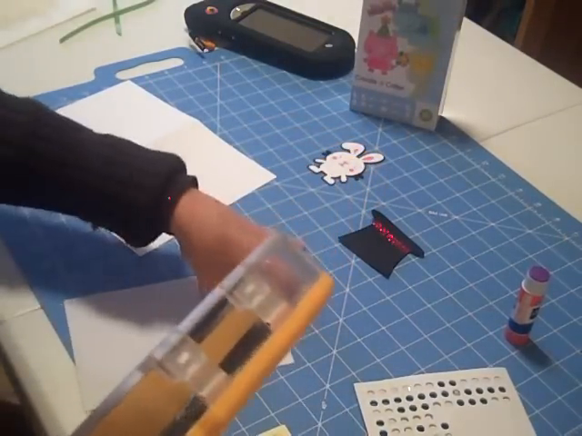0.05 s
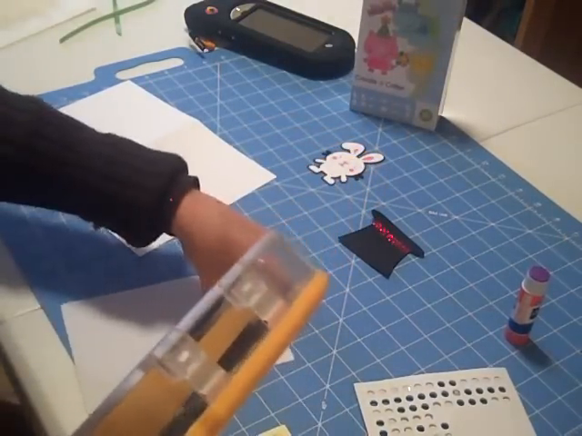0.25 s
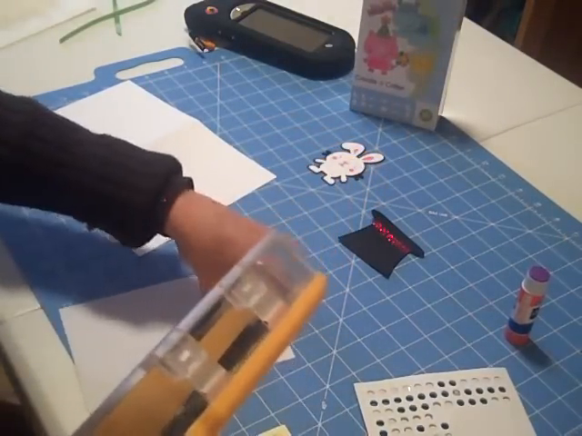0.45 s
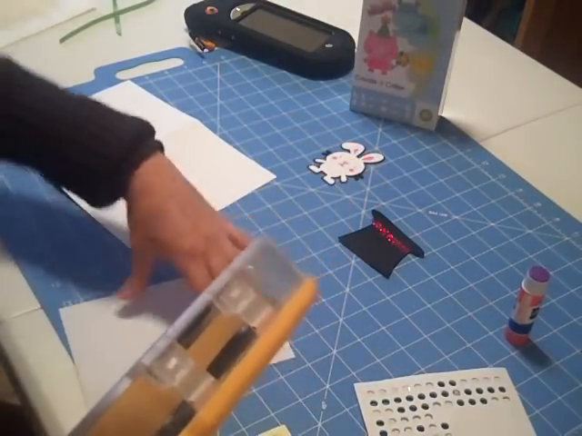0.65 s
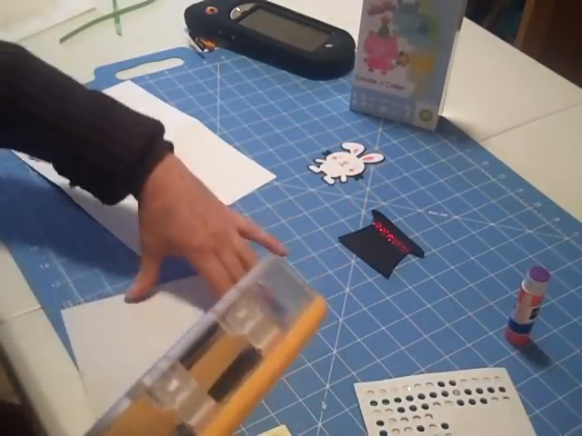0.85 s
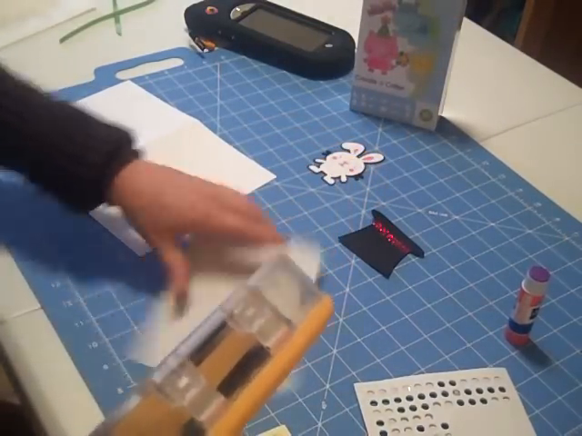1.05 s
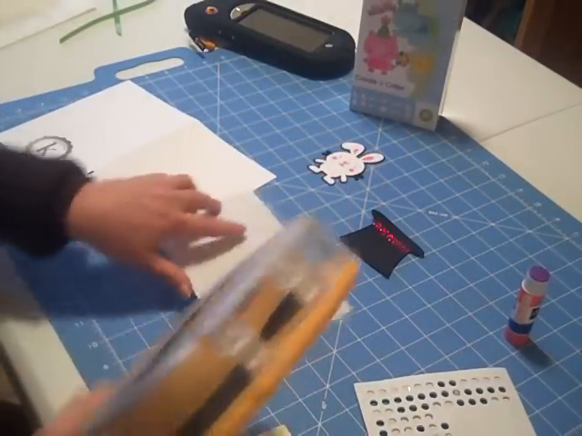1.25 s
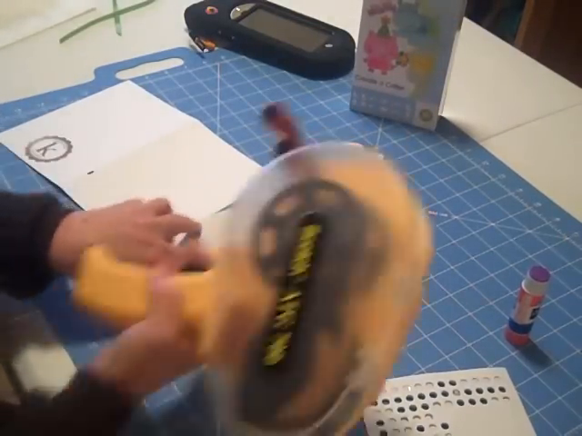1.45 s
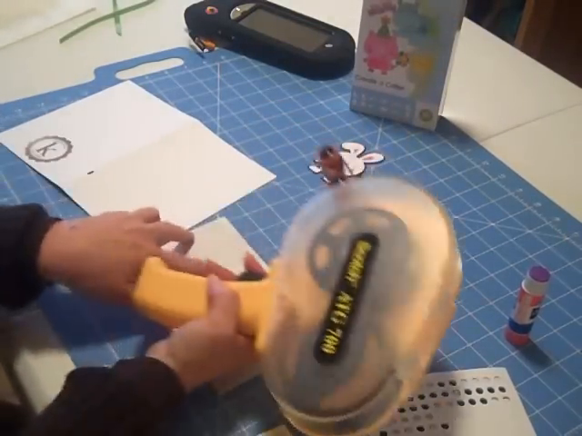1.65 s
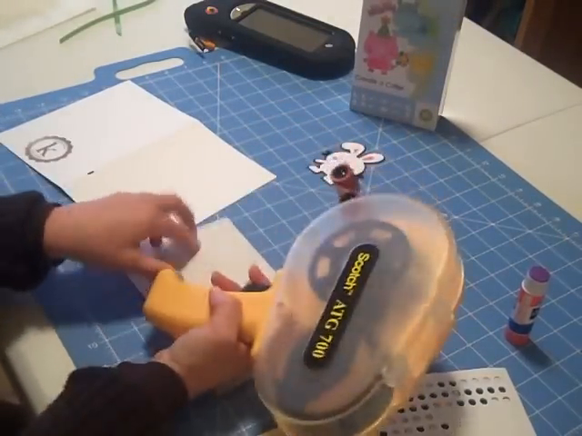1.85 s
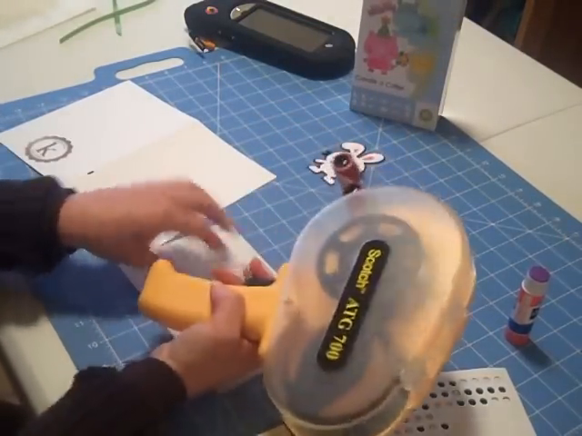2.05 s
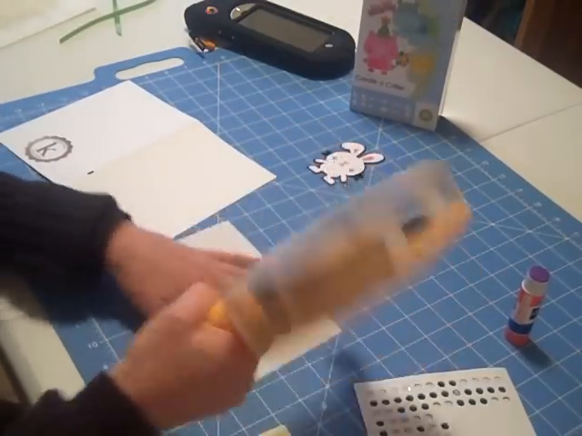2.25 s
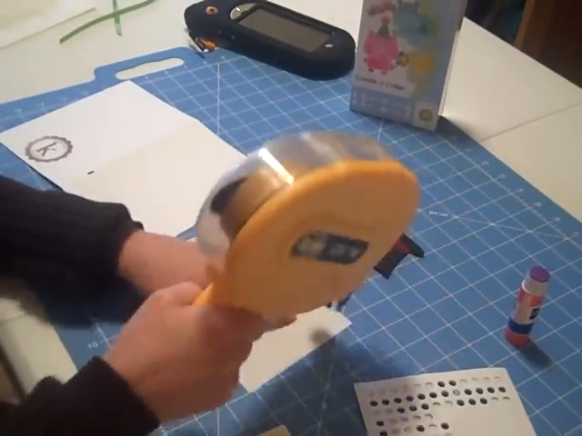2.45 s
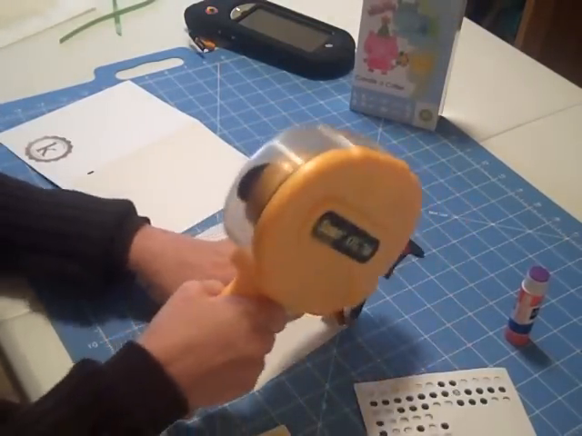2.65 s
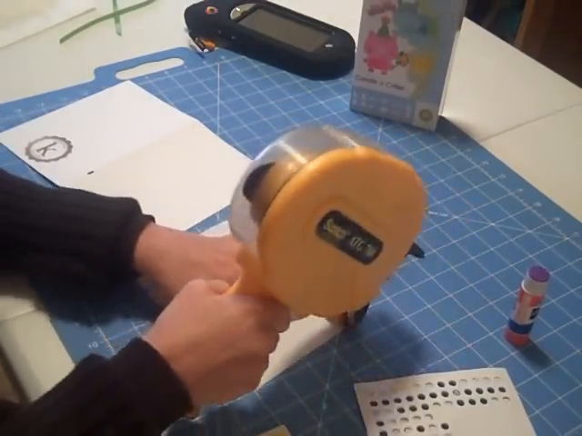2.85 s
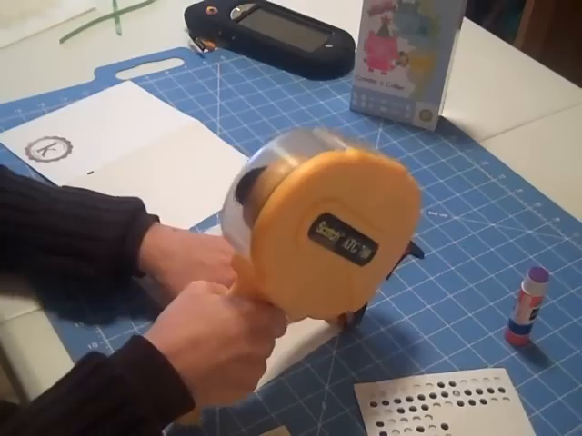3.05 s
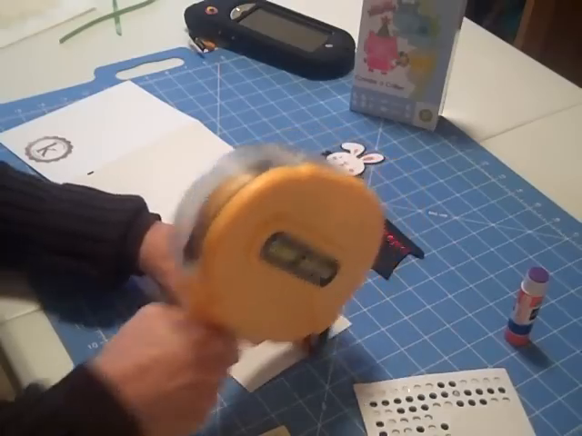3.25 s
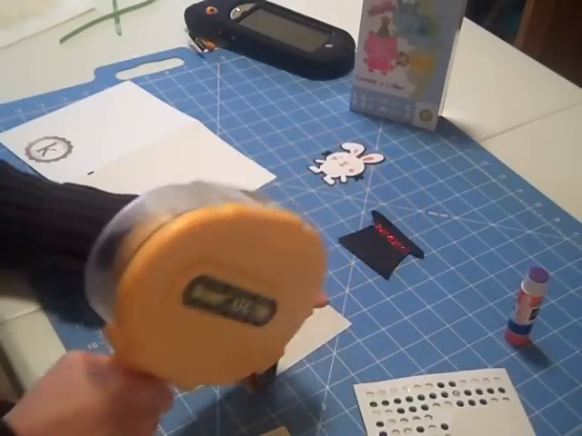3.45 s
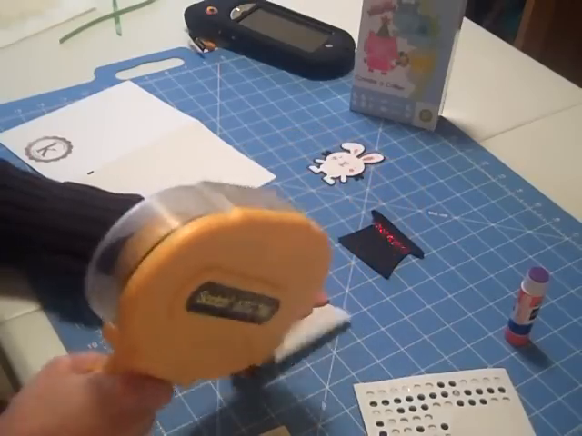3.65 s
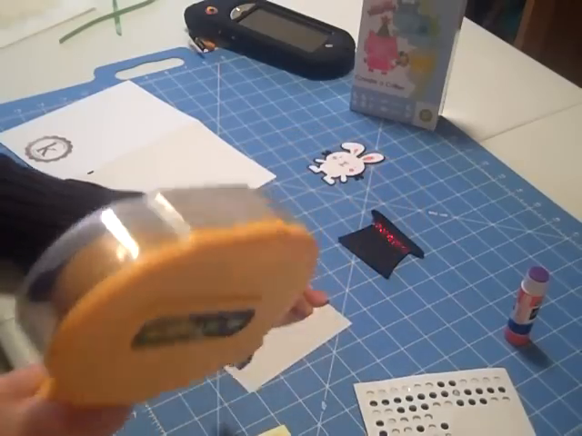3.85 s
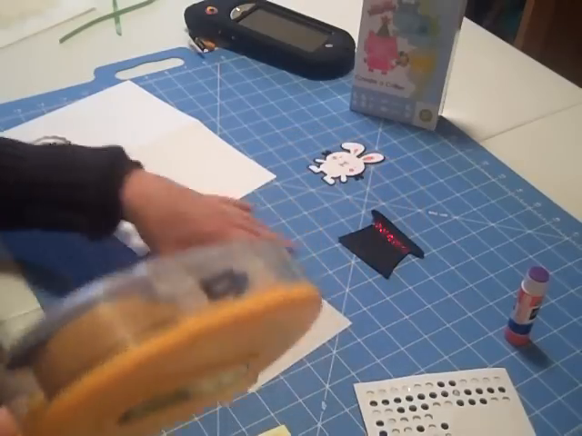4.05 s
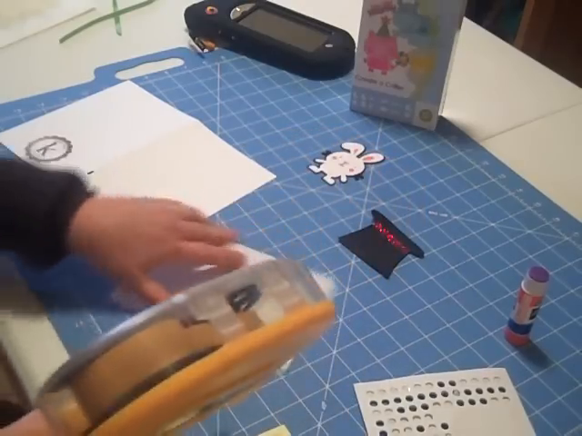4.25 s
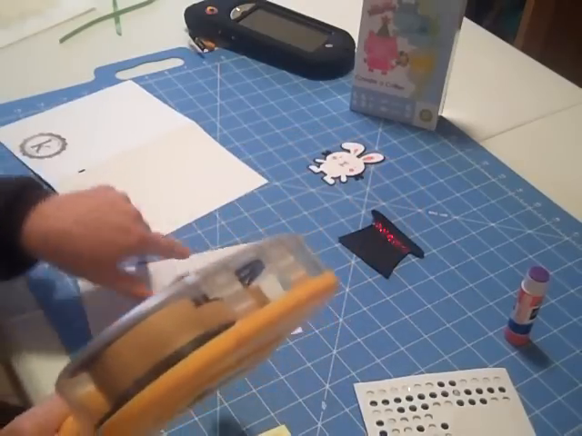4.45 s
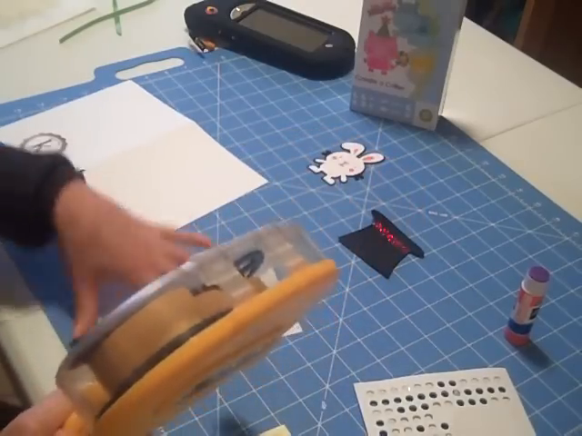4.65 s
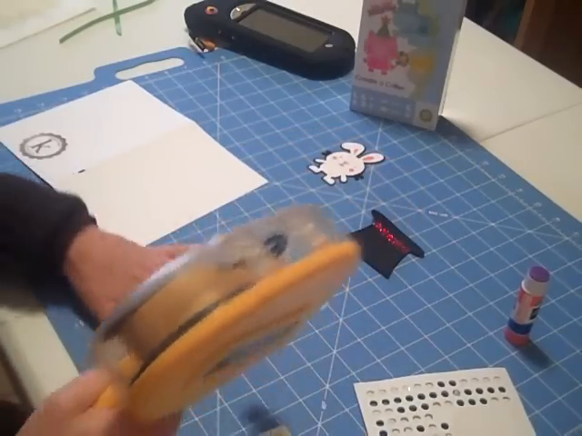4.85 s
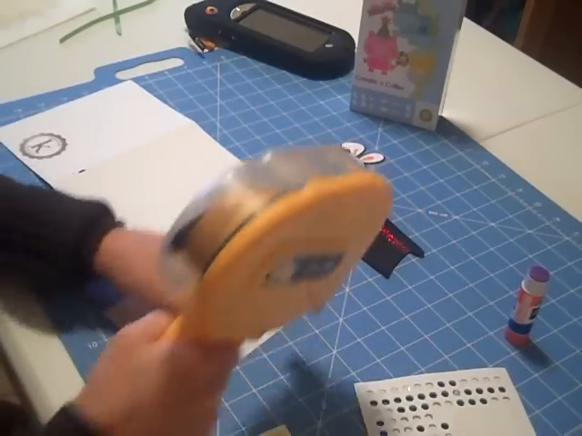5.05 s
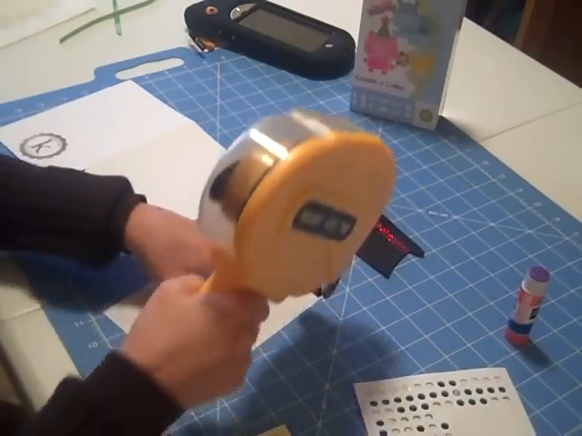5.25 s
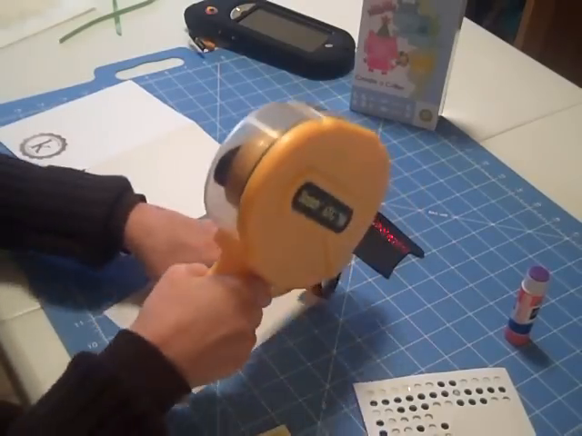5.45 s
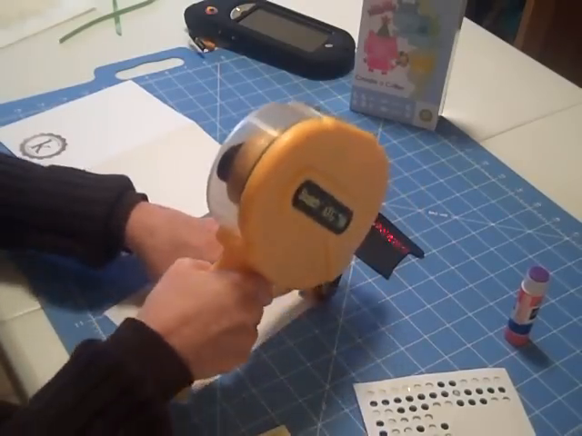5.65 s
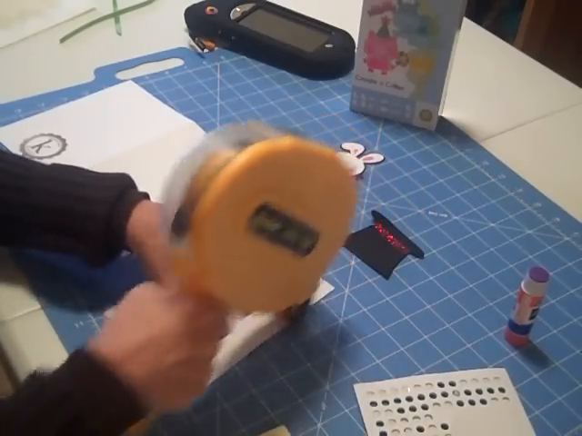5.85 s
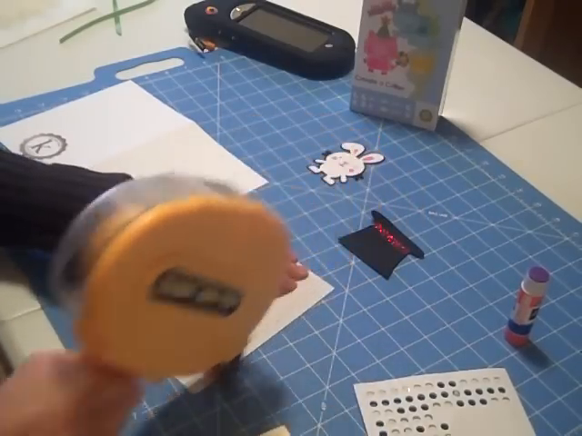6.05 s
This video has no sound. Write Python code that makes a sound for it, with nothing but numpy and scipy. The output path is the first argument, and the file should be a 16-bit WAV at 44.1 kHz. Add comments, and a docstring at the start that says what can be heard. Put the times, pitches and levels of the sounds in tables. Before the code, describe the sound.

Card slides and hollow plastic knocks lead into a crackling adhesive rasp, a loud tape snap, more rattling, and a second stronger rasp.

```python
"""A plastic tape gun at a craft table in a small quiet room, over steady air noise and a faint hum.
First the gun scuffs and rattles as modal taps, card slides as filtered grains, an edge flicks, the reel squeals.
Near 3 s comes a rasping pass: random adhesive jerks crackle in the air and excite the housing's resonances.
The tape then snaps in a run of cracks over ringing modes, and the loose reel spins on as a gliding squeal.
The card slides again, the housing rattles, and a second, louder pass ends the scene."""
import sys
import numpy as np
from scipy import signal
from scipy.fft import rfft, irfft, next_fast_len
from scipy.io import wavfile
from scipy.ndimage import map_coordinates

SR = 44100
rng = np.random.default_rng(int(sys.argv[2]) if len(sys.argv) > 2 else 0)


def store_pcm(level_fs):
    """Save levels as 16-bit WAV."""
    pcm = np.round(np.clip(level_fs, -1, 1) * 32767).astype(np.int16)
    wavfile.write(sys.argv[1], SR, np.atleast_2d(pcm).T)


N = 269451
TIME_S = np.arange(N) / SR
HIT_TIME_S = TIME_S[:SR // 8]

# room air, relative spectrum: (frequency [Hz], level [dB])
AIR_SPECTRUM = [(12, 0), (20, 5.5), (27, -7), (81, -16), (227, -14), (261, -14), (292, -9.5), (326, -14),
                (637, -14), (797, -16), (1650, -20), (1790, -19.5), (1950, -20), (2370, -22.5),
                (15800, -36)]
# hum of a distant appliance: (frequency [Hz], level [dB])
HUM_TONES = [(236.9, -73.5), (296.1, -77)]
# room decay: (frequency [Hz], t60 [s])
ROOM_DECAY = [(150, 0.97), (600, 0.59), (1500, 0.39), (4000, 0.33), (9000, 0.28), (16000, 0.26)]
# soft bumps on the table: (time [s], frequency [Hz], level [dB])
TABLE_BUMPS = [(0.038, 157, -62), (0.321, 156, -59.5), (2.32, 35.44, -63), (4.18, 35.8, -61),
               (5.662, 158.2, -51.5)]
# card sliding on the mat: (start [s], attack [s], hold [s], release [s], rub level at full speed [dB],
# hiss re rub [dB], sheet resonance re rub [dB], sheet resonance centre [Hz])
CARD_SLIDES = [(0.45, 0.21, .13, 0.2, -70, -3, 0.5, 3650), (0.959, 0.024, 0.062, .05, -73, 13.5, -5, 2460),
               (1.074, 0.018, 0.0064, .07, -61, 11, -6, 2389),
               (1.115, 0.056, 0.024, 0.046, -54.5, 3.5, -3.5, 2755),
               (0.967, 0.48, .17, .2, -63.5, 1, -8, 2400), (1.597, 0.17, .03, .15, -71, 3, -13, 2580),
               (1.794, .085, 0.015, .14, -54.5, 0.5, -10.5, 3050),
               (2.264, 0.081, 0.095, 0.11, -61, 2, -5, 2750), (4.097, 0.26, .09, .15, -59, 5.5, -3, 2383),
               (4.473, 0.022, 0.0094, 0.07, -50, -15, -8, 2550),
               (4.665, 0.24, 0.1, 0.11, -60.5, 3, -0.5, 2720)]
# gun scuffing on the card as it is lifted or set down:
# (start [s], attack [s], hold [s], release [s], level at full speed [dB])
GUN_SCUFFS = [(0.0, 0.0031, 0.047, 0.29, -56.5), (0.22, 0.1, 0.013, .11, -54.5),
              (2.548, .02, 0.045, .3, -56.5)]
# dry flicks of card edge and tape: (time [s], level [dB])
EDGE_FLICKS = [(0.233, -30), (1.9701, -6), (3.752, -27)]
# knocks of roller, trigger and reel in the housing: (time [s], clack level [dB], thud re clack [dB],
# tick re clack [dB], clack centre [Hz], time between rebounds [s], 0 = single knock)
HOUSING_KNOCKS = [(0.016, -38, 11.5, -6, 2400, 0.00042), (0.044, -29, 2.5, -5, 2380, 0.0083),
                  (0.445, -35.5, 0, -1, 1580, 0), (1.089, -27, -21, -1, 1600, 0.001),
                  (1.283, -31.5, -18, 1, 2030, 0.00049), (1.525, -21.5, -13, -21, 1336, 0.00021),
                  (1.543, -19.5, -16.5, -10, 1263, 0.023), (2.361, -24.5, -29, -14, 1290, 0),
                  (2.49, -31, -17, -20, 1190, 0), (2.555, -24.5, -2.5, -0.5, 1390, 0.017),
                  (2.913, -34, -5, -7, 1390, 0.02), (3.077, -32.5, -6, -4, 1280, 0),
                  (3.111, -23, -15, -11.5, 1627, 0.00083), (3.159, -20.5, -22, -18, 1710, 0.0017),
                  (3.295, -27.5, 2, 2, 2150, 0), (3.618, -22.5, -15, -12.5, 1300, 0.00037),
                  (4.016, -26.5, -25, 1, 2800, 0.0012), (4.264, -30, -15, -15, 1323, 0.002),
                  (4.487, -25.5, -10.5, -4, 1870, 0.0053), (5.654, -25.5, -3.5, -8, 1240, 0.00095),
                  (5.663, -14, -8, -16.5, 1400, .0105), (5.802, -17, -27, -20, 1907, 0.00098),
                  (5.821, -30, 9, -22, 1060, 0.0013), (5.907, -21, -18, -2.5, 1290, 0)]
# free spins of the reel:
# (fastest moment [s], run-up [s], run-down [s], top squeal frequency [Hz], level at top [dB])
REEL_SPINS = [(1.512, .135, 0.1, 5620, -65), (4.045, .23, 0.1, 5437, -64.5)]
# squeal partials: (multiple of squeal frequency [ratio], relative level [dB])
SQUEAL_PARTIALS = [(1.001, 1), (1.28, -8), (1.999, -3.5)]
# housing's ring under the snap: (frequency [Hz], relative level [dB], t60 [s])
SNAP_RING = [(488, -34, 1.1), (646.5, -23, 0.12), (942.7, -37, 0.087), (1086, -20.5, 0.19),
             (1240, -12.5, 0.14), (1500, -27, 0.05), (1595, -7, 0.06), (1685, 3, 0.018), (1760, -13, 0.046),
             (1984, -14.5, 0.063), (2770, -14, 0.033), (2960, -24, 0.085), (3460, -15, .04)]
# resonances of the hollow housing: (frequency [Hz], undamped width [Hz], relative strength [dB])
HOUSING_MODES = [(321.35, 27, -13.5), (541, 96, -2), (709, 142, 1.5), (1206, 134, 1), (1400, 77.6, 0.5),
                 (1572, 89, -1.5), (1750, 100, 0.5), (2086, 280, 1), (3030, 180, -9), (2985, 97, -10.5),
                 (3940, 260, -8.5), (4170, 130, -10)]
# passes of the gun: (start [s], attack [s], hold [s], release [s], rasp level at full speed [dB])
GUN_PASSES = [(3.04, .34, .15, 0.1, -44), (5.776, .2, .2, .09, -40)]
# card rub, relative spectrum: (frequency [Hz], level [dB])
RUB_SPECTRUM = [(300, -21.5), (900, -10.5), (1800, -3.5), (2800, -4), (4500, -1), (7000, -13.5),
                (12000, -33)]
# card hiss, relative spectrum: (frequency [Hz], level [dB])
HISS_SPECTRUM = [(2500, -26), (5000, -1), (7000, 0), (10000, 2.5), (12000, -4.5), (16000, -5)]
# gun scuff, relative spectrum: (frequency [Hz], level [dB])
SCUFF_SPECTRUM = [(59, -66), (100, -36), (236, -13), (310, -4), (482, -18), (607, -8), (867, -13),
                  (942, -13.5), (1320, -15), (2470, -15.5), (3460, -26.5), (4940, -26), (15000, -35.5)]
# edge flick, relative spectrum: (frequency [Hz], level [dB])
EDGE_SPECTRUM = [(30, 3), (300, -6.5), (1200, -7), (2500, -0.5), (5000, 4), (8000, -5), (10000, 1),
                 (12000, -15), (16000, -5.5)]
# contact tick, relative spectrum: (frequency [Hz], level [dB])
TICK_SPECTRUM = [(1500, -17.5), (2800, 2), (4500, -1.5), (8000, -10.5), (16000, -21.5)]
# tape snap, relative spectrum: (frequency [Hz], level [dB])
CRACK_SPECTRUM = [(60, -27), (200, -25), (330, -17.5), (500, 1), (800, -5), (1300, 4), (1650, 4.5),
                  (2200, 1), (3000, 1), (4000, -1.5), (5000, -6), (8000, -7), (12000, -16), (16000, -19)]
# peeling tape, relative spectrum: (frequency [Hz], level [dB])
PEEL_SPECTRUM = [(200, -16.5), (900, 2), (2500, -3), (4000, 3), (6000, -2), (10000, 0.5), (12000, -5),
                 (16000, -8)]

AIR_DB, BAND_LIMIT_HZ = -62.5, 15900
STROKE_DEPTH_DB = 24.5  # gained over a stroke's attack, lost over its release
CATCH_S, CATCH_DB, CATCH_RISE_DB = .015, -9, 21  # scrape before a flick: length, level re flick, growth
REBOUND_LOSS_DB, THUD_LOSS_DB = 4, 1.5  # per rebound: clack and tick, thud
SPIN_SAG_RATIO, SPIN_FADE_DB = .15, 12  # pitch share and level lost at either end of a spin
SNAP_S, SNAP_DB = 3.787, -2.5
TEAR_GAP_S = .00062  # between cracks across the tape's width
# reel chatter: spacing, first hit, loss per doubling of the count
CHATTER_GAP_S, CHATTER_DB, CHATTER_FALL_DB = .006, -5, 5
PEEL_DB, PEEL_SPEED_RATIO = -5.5, 1.2  # re rasp at full speed; peel dB per dB of speed


def amp(db):
    """Decibels to gain."""
    return 10 ** (np.asarray(db) / 20)


def unit(x):
    """x at rms 1."""
    return x / np.sqrt(np.mean(x ** 2) + 1e-20)


def unit_energy(x):
    """x at energy 1."""
    return x / np.linalg.norm(x)


def along(points, hz):
    """(Hz, value) points read on a log axis."""
    f, v = np.transpose(points)
    return np.interp(np.log(hz + 1), np.log(f + 1), v)


def add(track, s, sound):
    """Mix a sound into the track at time s."""
    part = track[max(round(s * SR), 0):][:len(sound)]
    part += sound[:len(part)]


def colour(x, spectrum, size=8192):
    """Causal minimum-phase filter with the given spectrum."""
    log_gain = np.log(amp(along(spectrum, np.fft.rfftfreq(size, 1 / SR))))
    cepstrum = irfft(log_gain)
    # fold onto positive time
    cepstrum[1:size // 2] *= 2
    cepstrum[size // 2 + 1:] = 0
    impulse_response = irfft(np.exp(rfft(cepstrum)))
    return signal.fftconvolve(x, impulse_response)[:len(x)]


def no_bass(x):
    """Small objects send out little bass."""
    return signal.sosfilt(signal.butter(2, 250, "highpass", fs=SR, output="sos"), x)


def wobble(rate_hz):
    """Smooth random curve through rate_hz knots a second."""
    knots = rng.standard_normal(int(N * rate_hz / SR) + 4)
    return map_coordinates(knots, [TIME_S * rate_hz])


def grains(rate_hz, spread_db):
    """Tiny slips at random times, of random sign and uneven size."""
    slips = rng.random(N) < rate_hz / SR
    signs = rng.choice([-1, 1], N)
    sizes = amp(spread_db * rng.standard_normal(N).clip(-2, 2))
    return unit(slips * signs * sizes)


def burst(t60_s):
    """Puff of noise that falls 60 dB in t60_s."""
    return rng.standard_normal(len(HIT_TIME_S)) * amp(-60 * HIT_TIME_S / t60_s)


def mode(hz, t60_s, time_s):
    """One dying sine."""
    return np.sin(2 * np.pi * hz * time_s) * np.exp(-np.log(1000) * time_s / t60_s)


def crack(t60_s, fray):
    """Sharp impulse with a frayed tail of noise; fray is the tail's relative strength."""
    return unit_energy(signal.unit_impulse(len(HIT_TIME_S)) + fray * unit_energy(burst(t60_s)))


def stroke(start_s, attack_s, hold_s, release_s):
    """Speed of a hand stroke in dB re full speed: it gathers, holds and dies away."""
    rising = (TIME_S - start_s) / attack_s - 1
    falling = (start_s + attack_s + hold_s - TIME_S) / release_s
    return STROKE_DEPTH_DB * np.minimum(np.minimum(rising, falling), 0)


def housing(modes, scatter_db):
    """The shell's answer to one tap; mode strengths scatter with where it lands."""
    ring = np.zeros(len(HIT_TIME_S))
    for k, (hz, width_hz, db) in enumerate(modes):
        strength = (-1) ** k * amp(db + scatter_db * rng.normal()) * np.sqrt(width_hz)
        t60_s = np.log(1000) / (np.pi * width_hz)
        ring += strength * mode(hz, t60_s, HIT_TIME_S)
    return unit_energy(ring)


def contact(thud_db, tick_db, centre_hz):
    """One tap on the housing: a thud of its low modes, a clack of the higher ones, a contact tick."""
    low = [m for m in HOUSING_MODES if m[0] < 900]
    high = [m for m in HOUSING_MODES if m[0] >= 900]
    # the tap favours modes near its own pitch; the hand's grip doubles their width
    struck = [(hz, 2 * width_hz, db - 10 * abs(np.log2(hz / centre_hz))) for hz, width_hz, db in high]
    shell = amp(thud_db) * housing(low, scatter_db=4.5) + housing(struck, scatter_db=2)
    tick = amp(tick_db) * unit_energy(colour(burst(t60_s=0.028), TICK_SPECTRUM))
    # the parts grate for an instant as they meet
    grate = signal.fftconvolve(shell, burst(t60_s=.008))[:len(tick)]
    return np.linalg.norm(shell) * unit_energy(grate) + tick


def background():
    """Steady air noise and a faint hum of wavering phase."""
    hum = sum(amp(db) * np.sin(2 * np.pi * hz * TIME_S + 1.27 * wobble(7.1)) for hz, db in HUM_TONES)
    air = unit(colour(rng.standard_normal(N), AIR_SPECTRUM))
    return amp(AIR_DB) * air + hum


def room(x, early_db, tail_db, count=30):
    """Quick reflections from nearby things, then the walls' short tail; both change as the gun moves about."""
    out = np.zeros(N)
    for part in np.array_split(np.arange(N), count):
        hz, time_s, bins = signal.stft(rng.standard_normal(SR // 2), SR, nperseg=256)
        decay = amp(-60 * time_s / along(ROOM_DECAY, hz)[:, None])
        tail = signal.istft(bins * decay, SR, nperseg=256)[1]
        echo = np.zeros(SR // 2)
        add(echo, .003, amp(early_db) * unit_energy(burst(t60_s=0.1)))
        add(echo, .009, amp(tail_db) * unit_energy(tail))
        add(out, part[0] / SR, signal.fftconvolve(x[part], echo))
    return out


def table():
    """The table top gives a deep, soft shudder under hand or gun: one low mode per bump."""
    out = np.zeros(N)
    for s, hz, db in TABLE_BUMPS:
        add(out, s, amp(db) * mode(hz, t60_s=0.41, time_s=TIME_S[:SR // 2]))
    return out


def card():
    """Paper fibres brush the mat in tiny slips; the gun drags dully on the sheet."""
    fibres = unit(colour(grains(rate_hz=7000, spread_db=3.0), RUB_SPECTRUM))
    hiss = unit(colour(grains(rate_hz=14000, spread_db=4.5), HISS_SPECTRUM))
    scuff = unit(colour(grains(rate_hz=1500, spread_db=4.0), SCUFF_SPECTRUM))
    # the sheet's resonance wanders as the fingers bend it
    flutter, bend_hz = wobble(800), 140 * wobble(600)
    sliding = np.zeros(N)
    for *timing, db, hiss_db, sheet_db, sheet_hz in CARD_SLIDES:
        phase = 2 * np.pi * np.cumsum(sheet_hz + bend_hz) / SR
        sheet = unit(flutter * np.sin(phase))
        rub = fibres + amp(sheet_db) * sheet + amp(hiss_db) * hiss
        sliding += amp(db + stroke(*timing)) * rub
    unevenness = amp(1.8 * wobble(60))
    scuff_gain = sum(amp(db + stroke(*timing)) for *timing, db in GUN_SCUFFS)
    return sliding * unevenness + scuff * scuff_gain


def flicks():
    """A stiff edge catches, scrapes ever harder and springs free, without any ring."""
    out = np.zeros(N)
    strain = amp(CATCH_RISE_DB * np.linspace(0, 1, round(CATCH_S * SR)))
    for s, db in EDGE_FLICKS:
        scrape = strain * grains(rate_hz=2300, spread_db=2)[:len(strain)]
        add(out, s - CATCH_S, amp(db + CATCH_DB) * unit_energy(colour(scrape, EDGE_SPECTRUM)))
        spring = crack(t60_s=.007, fray=3)
        add(out, s, amp(db) * unit_energy(colour(spring, EDGE_SPECTRUM)))
    return out


def knocks(count=4):
    """Loose plastic parts tap the housing; some rattle on, each rebound weaker and duller."""
    out = np.zeros(N)
    for s, db, thud_db, tick_db, centre_hz, gap_s in HOUSING_KNOCKS:
        for k in range(count if gap_s else 1):
            tap = contact(thud_db + k * (REBOUND_LOSS_DB - THUD_LOSS_DB), tick_db, centre_hz)
            add(out, s + k * gap_s, amp(db - k * REBOUND_LOSS_DB) * tap)
    return out


def reel():
    """The spinning reel squeals on its axle, higher and louder the faster it turns."""
    out = np.zeros(N)
    for s, run_up_s, run_down_s, top_hz, db in REEL_SPINS:
        # 0 at the fastest moment, 1 at either end
        slowness = ((TIME_S - s) / np.where(TIME_S < s, run_up_s, run_down_s)) ** 2
        hz = top_hz * np.maximum(1 - SPIN_SAG_RATIO * slowness, 0)
        phase = 2 * np.pi * np.cumsum(hz * (1 + .006 * wobble(500))) / SR
        squeal = sum(amp(partial_db) * np.sin(k * phase) for k, partial_db in SQUEAL_PARTIALS)
        out += amp(db - SPIN_FADE_DB * slowness) * squeal
    return out


def snap():
    """Taut tape breaks in a run of cracks, the reel chatters on its hub, the recoil rings the whole gun."""
    out = np.zeros(N)
    tearing = [(SNAP_S + k * TEAR_GAP_S, SNAP_DB) for k in range(3)]
    chatter = [(SNAP_S + k * CHATTER_GAP_S, CHATTER_DB - CHATTER_FALL_DB * np.log2(k))
               for k in range(1, 7)]
    for s, db in tearing + chatter:
        tear = crack(t60_s=.007, fray=1.6)
        add(out, s, amp(db) * unit_energy(colour(tear, CRACK_SPECTRUM)))
    # the tear starts a moment before the tape gives way
    add(out, SNAP_S - .004, amp(-13.5) * unit_energy(colour(burst(t60_s=0.08), CRACK_SPECTRUM)))
    ring_time_s = TIME_S[:SR]
    ring = sum(amp(db) * mode(hz, t60_s, ring_time_s) for hz, db, t60_s in SNAP_RING)
    # the shell takes a cycle or so to reach full swing
    swing = 1 - np.exp(-ring_time_s / .0007)
    add(out, SNAP_S, amp(-14.5) * ring * swing)
    return out


def passes():
    """Adhesive lets go in tiny jerks and a few larger ones, which crackle in the air and shake the housing."""
    small_jerks = grains(rate_hz=3500, spread_db=4) * amp(3.1 * wobble(150))
    jerks = small_jerks + .75 * grains(rate_hz=90, spread_db=3)
    rasp = unit(signal.fftconvolve(jerks, housing(HOUSING_MODES, scatter_db=0.5))[:N])
    peel = unit(colour(jerks + rng.standard_normal(N), PEEL_SPECTRUM))
    out = np.zeros(N)
    for *timing, db in GUN_PASSES:
        speed_db = stroke(*timing)
        out += amp(db + speed_db) * rasp
        out += amp(db + PEEL_DB + PEEL_SPEED_RATIO * speed_db) * peel
    return out


def scene():
    """All sources direct, plus their room echo; knocks send the most into the room, rubbing the least."""
    rubbing = passes() + card() + reel()
    tapping = no_bass(knocks())
    snapping, flicking = snap(), flicks()
    sent = amp(-4.5) * rubbing + amp(2.0) * tapping + amp(-1.5) * snapping + amp(-4) * flicking
    direct = rubbing + tapping + snapping + flicking + table()
    echoes = room(no_bass(sent), early_db=-6.5, tail_db=-7.0)
    return (direct + echoes + background())[None]


def record(dry):
    """Brick-wall low-pass at the band limit."""
    size = next_fast_len(N + SR // 2)
    passband = np.fft.rfftfreq(size, 1 / SR) < BAND_LIMIT_HZ
    return irfft(rfft(dry, size) * passband, size)[:, :N]


dry = scene()
out = record(dry)
store_pcm(out)
```